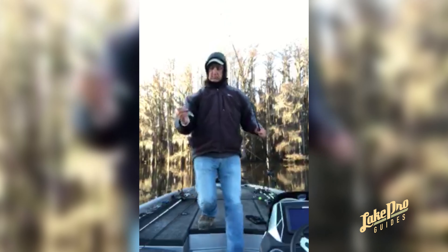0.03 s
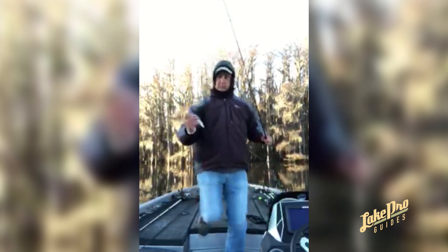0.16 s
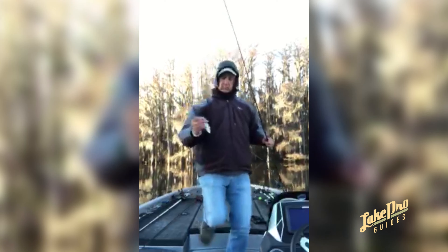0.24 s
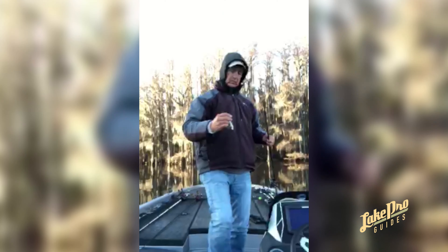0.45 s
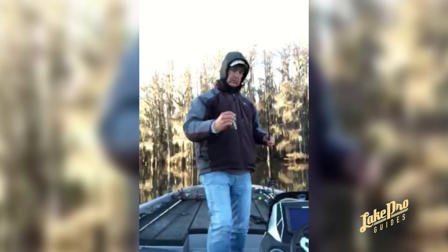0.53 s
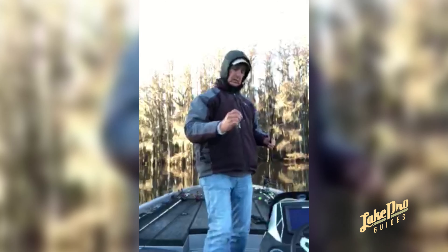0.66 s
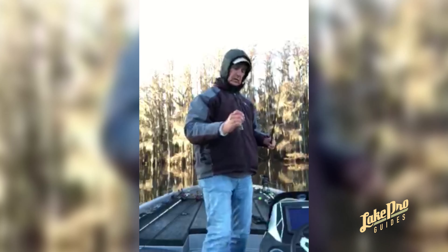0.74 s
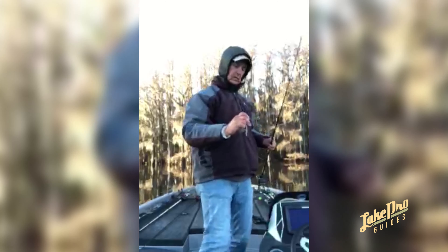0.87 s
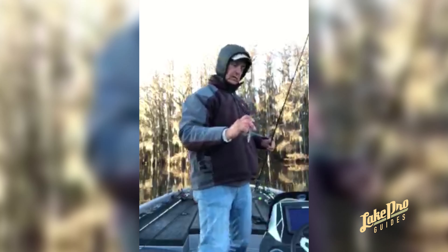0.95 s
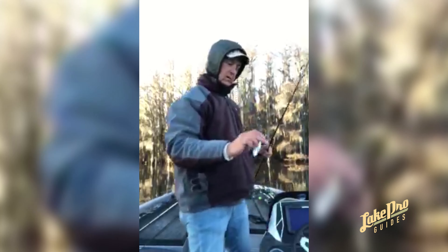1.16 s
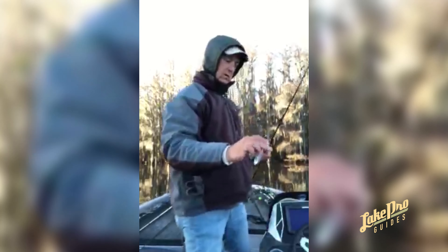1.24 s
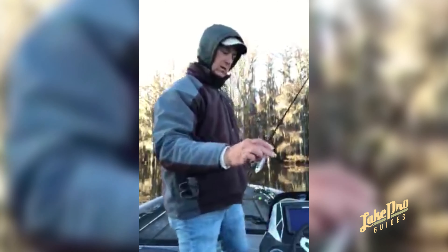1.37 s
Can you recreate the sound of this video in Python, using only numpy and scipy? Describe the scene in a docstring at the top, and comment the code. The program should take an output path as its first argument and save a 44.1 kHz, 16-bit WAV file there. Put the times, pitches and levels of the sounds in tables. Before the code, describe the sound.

Two footsteps thump on a hollow boat deck, with a scrape and click between.

```python
"""Two footsteps thump on the hollow deck of a small boat on calm water. Each sole contact rings
the deck, and the hull booms as the weight sinks onto it. Between the steps come a brief scrape of
hiss and tiny catches, then a sharp click and faint ticks, like fishing tackle.
A low rumble and a thin distant whirr lie underneath."""
import sys
import numpy as np
from scipy import signal
from scipy.fft import rfft, irfft, next_fast_len
from scipy.io import wavfile
from scipy.ndimage import map_coordinates

SR = 44100
rng = np.random.default_rng(int(sys.argv[2]) if len(sys.argv) > 2 else 0)


def unload_wav(signal):
    """Save mono or channel-first audio to the path in sys.argv[1] as 16-bit WAV at rate SR, clipped to [-1, 1]."""
    wavfile.write(
        sys.argv[1],
        SR,
        np.round(np.clip(np.atleast_2d(signal).T, -1, 1) * 32767).astype(np.int16),
    )


N = 61739

# Tone of the rumbling air. Each row: frequency in Hz, relative level in dB.
AIR_COLOUR = [(15, -34.5), (25, -47), (49, 1), (136, 1), (289, -12), (349, -13), (509, -16), (722, -16.5),
              (1050, -21.5), (1410, -16), (1570, -24), (3530, -26.5), (15500, -41)]
# Fader ride of the air. Each row: time in seconds, level in dB.
AIR_RIDE = [(0, -57.5), (.2, -53), (.45, -54.5), (.67, -55.5), (.85, -56), (1.1, -54.5), (1.4, -52.5)]
# Narrow hums in the rumble. Each row: centre in Hz, width in octaves, level in dB.
HUM_BANDS = [(70, 0.033, -71), (114.3, 0.064, -63)]
# Fader ride of the whirr. Each row: time in seconds, gain in dB.
WHIRR_RIDE = [(0, -119), (.17, -56), (.45, -65), (.68, -69), (.8, -54), (1.0, -65), (1.15, -58), (1.4, -83)]
# Tone of the whirr. Each row: centre in Hz, width in octaves, relative level in dB.
WHIRR_BANDS = [(1384, 0.057, -7.5), (1220, 0.05, -13)]
# Faint ticks. Each row: start in seconds, level in dB, centre in Hz, width in octaves,
# rise in seconds, t60 (time to fall 60 dB) in seconds.
TICKS = [(0.013, -53, 2780, 0.63, 0.0013, 0.034), (0.394, -53, 13700, 0.27, 0.00089, 0.023),
         (.904, -52.5, 11400, 0.36, 0.0018, 0.023), (0.95, -52.5, 5700, 0.76, 0.0014, 0.027),
         (1.09, -41.5, 7150, 0.9, 0.0054, 0.043), (1.135, -58, 13100, .5, 0.0015, 0.034)]
# Ring of the click. Each row: pitch in Hz, t60 in seconds, relative level in dB.
CLICK_MODES = [(4390, 0.0045, 5.5), (8100, 0.0083, -18), (10800, .003, -15)]
# Swell of the scrape. Each row: time in seconds, level in dB.
SCRAPE_RIDE = [(.505, -90), (.521, -45), (.541, -46), (.551, -46), (.571, -38), (.6, -44.5), (.625, -53.5),
               (.645, -79)]
# Tone of the scrape. Each row: frequency in Hz, relative level in dB.
SCRAPE_COLOUR = [(88, -27), (150, -3.5), (285, -5), (320, 1), (607, -7), (681, 3), (722, -15), (827, 0),
                 (1060, -8.5), (1150, -4.5), (1600, -3), (1760, -3), (2230, -3.5), (4390, -8), (15500, -31)]
# The scrape catches. Each row: start in seconds, level in dB.
SNAGS = [(0.538, -34), (0.543, -35), (0.5684, -34)]
# Boom of the hull. Each row: pitch in Hz, t60 in seconds, relative level in dB.
HULL_MODES = [(70.2, 0.2, -5.5), (110, 0.13, -10.5)]
# Weight sinks onto the hull. Each row: start in seconds, gain in dB.
HULL_LOADS = [(0.249, -27.5), (0.309, -30.5), (0.371, -35.5), (1.189, -36)]
# Ring of the deck. Each row: pitch in Hz, t60 in seconds, relative levels in dB at spots 0 and 1.
DECK_MODES = [(138.3, 0.17, -49.5, -32.5), (179.4, 0.19, -23.5, -25), (196.5, 0.23, -38, -25.5),
              (223, .18, -24, -32.5), (283.4, 0.11, -25.5, -18), (364, 0.088, -25.5, -24),
              (423.4, 0.094, -21, -37.5), (476, 0.12, -31.5, -36.5), (530, 0.085, -28.5, -37),
              (636.6, 0.095, -20.5, -35.5), (703.5, 0.063, -19.5, -37), (882, 0.064, -21.5, -55.5),
              (1060, 0.085, -27, -57), (1366, 0.068, -31, -70), (1432, 0.065, -33.5, -46)]
# The sole lands. Each row: start in seconds, gain in dB, deck spot (0 or 1), softness cut-off in Hz.
SOLE_CONTACTS = [(0.2279, 0, 0, 2000), (0.2427, -5.5, 0, 450), (.32, -12, 0, 184), (1.1788, 0, 1, 1020),
                 (1.24, -13, 1, 203), (1.31, -23.5, 1, 220)]
# Knocks and scuffs of the sole. Each row: start in seconds, level in dB, centre in Hz,
# width in octaves, t60 in seconds.
SOLE_KNOCKS = [(0.2246, -47.5, 1490, 0.8, 0.088), (0.227, -55.5, 4630, 0.66, 0.12),
               (.232, -30.5, 736, 0.49, 0.088), (0.253, -58, 2370, 1.04, 0.42), (0.317, -54, 1670, 1, 0.15),
               (0.6203, -36, 3220, 0.53, .012), (1.1743, -40.5, 3150, 0.51, 0.062),
               (1.1773, -36.5, 1100, 0.58, 0.063), (1.311, -44.5, 586, 0.37, 0.054)]
# The heel's first hard clack. Each row: pitch in Hz, t60 in seconds, level in dB.
HEEL_MODES = [(1100, 0.0078, -23.5), (1490, 0.011, -19), (1900, 0.0039, -22.5)]

HEEL_S, CLICK_S, KNOCK_RISE_S = 0.2266, 0.9789, 0.00065
GRAINS_PER_S, AIR_SWAY_DB, TOP_HZ = 3900, 1.5, 15800


def amp(db):
    """Decibels to gain."""
    return 10 ** (np.asarray(db) / 20)


def unit(x):
    """Scale to rms 1."""
    return x / np.sqrt(np.mean(x ** 2) + 1e-20)


def since(start):
    """Seconds since the start, zero before it."""
    return np.maximum(np.arange(N) / SR - start, 0)


def ride(points):
    """Gain curve through (seconds, dB) points."""
    return amp(np.interp(np.arange(N) / SR, *np.transpose(points)))


def filtered(x, response):
    """Equalise x with a gain given as a function of Hz."""
    size = next_fast_len(N + 8192)
    return irfft(rfft(x, size) * response(np.fft.rfftfreq(size, 1 / SR)), size)[:N]


def coloured(x, colour):
    """Shape x by (Hz, dB) points, at rms 1."""
    points_hz, db = np.transpose(colour)
    return unit(filtered(x, lambda hz: amp(np.interp(np.log(hz + 1), np.log(points_hz + 1), db))))


def band(centre_hz, octaves):
    """Bell-shaped noise band of rms 1."""
    noise = rng.standard_normal(N)
    return unit(filtered(noise, lambda hz: np.exp(-.5 * (np.log2((hz + 1) / centre_hz) / octaves) ** 2)))


def fade(start, rise, t60):
    """Envelope that rises and dies away; all times in seconds."""
    t = since(start)
    return (1 - np.exp(-t / rise)) * np.exp(-np.log(1000) * t / t60)


def ring(start, modes, rise):
    """Struck, damped modes; neighbours swing in opposite directions."""
    return sum((-1) ** k * amp(db) * np.sin(2 * np.pi * hz * since(start)) * fade(start, rise, t60)
               for k, (hz, t60, db) in enumerate(modes))


def rumble():
    """A bed of low, gently swaying open air with narrow hums in it."""
    sway = map_coordinates(rng.standard_normal(32), [since(0) * 10])  # ten random points a second
    air = ride(AIR_RIDE) * amp(AIR_SWAY_DB * sway) * coloured(rng.standard_normal(N), AIR_COLOUR)
    return air + sum(amp(db) * band(hz, octaves) for hz, octaves, db in HUM_BANDS)


def whirr():
    """Two thin, distant noise bands swell and sink together."""
    return ride(WHIRR_RIDE) * sum(amp(db) * band(hz, octaves) for hz, octaves, db in WHIRR_BANDS)


def tackle():
    """One small hard click (crack of contact, ping, rough after-ring) and faint hissy ticks."""
    crack = amp(-10) * band(8600, octaves=0.33) * fade(CLICK_S, rise=0.00014, t60=0.0029)
    after_ring = amp(-19.5) * band(4220, octaves=0.28) * fade(CLICK_S, KNOCK_RISE_S, t60=0.046)
    low_cut = signal.butter(6, 3300, "high", fs=SR, output="sos")
    ping = signal.sosfilt(low_cut, ring(CLICK_S, CLICK_MODES, rise=0.00051))
    ticks = sum(amp(db) * band(hz, octaves) * fade(start, rise, t60)
                for start, db, hz, octaves, rise, t60 in TICKS)
    return amp(-26) * (ping + crack + after_ring) + ticks


def scrape():
    """A sliding stroke: equal parts hiss and tiny catches, with a few bigger snags."""
    grains = (rng.random(N) < GRAINS_PER_S / SR) * rng.standard_normal(N)
    rub = coloured(rng.standard_normal(N) + unit(grains), SCRAPE_COLOUR)
    sliding = (since(SCRAPE_RIDE[0][0]) > 0) * (since(SCRAPE_RIDE[-1][0]) == 0)
    snags = sum(amp(db) * fade(start, KNOCK_RISE_S, t60=0.02) for start, db in SNAGS)
    return rub * ride(SCRAPE_RIDE) * sliding + snags * coloured(rng.standard_normal(N), SCRAPE_COLOUR)


def hull_boom():
    """The hull rings low as the weight arrives."""
    return sum(amp(db) * ring(start, HULL_MODES, rise=0.0066) for start, db in HULL_LOADS)


def deck_thumps():
    """Each contact rings the deck, softer ones only its low modes."""
    thumps = np.zeros(N)
    for start, db, spot, soft_hz in SOLE_CONTACTS:
        modes = [(hz, t60, spot_db[round(spot)] - 10 * np.log10(1 + (hz / soft_hz) ** 4))
                 for hz, t60, *spot_db in DECK_MODES]
        thumps += amp(db) * ring(start, modes, rise=0.0038)
    return thumps


def footsteps():
    """Heel clack and sole scuffs give the steps their edge; deck and hull give them body."""
    heel = -ring(HEEL_S, HEEL_MODES, rise=0.0003)
    scuffs = sum(amp(db) * band(hz, octaves) * fade(start, KNOCK_RISE_S, t60)
                 for start, db, hz, octaves, t60 in SOLE_KNOCKS)
    return heel + scuffs + deck_thumps() + hull_boom()


def scene():
    """A mono mix in the open air."""
    return (footsteps() + scrape() + tackle() + rumble() + whirr())[None]


def record(dry):
    """A brick-wall high cut trims the very top of the treble."""
    return np.array([filtered(channel, lambda hz: hz < TOP_HZ) for channel in dry])


dry = scene()
out = record(dry)
unload_wav(out)
```